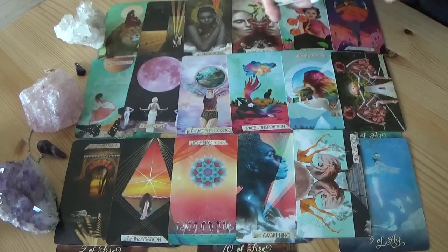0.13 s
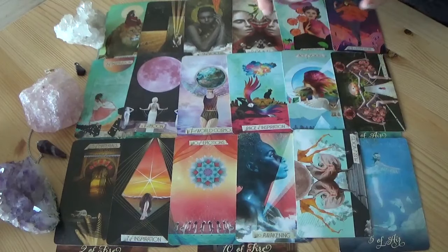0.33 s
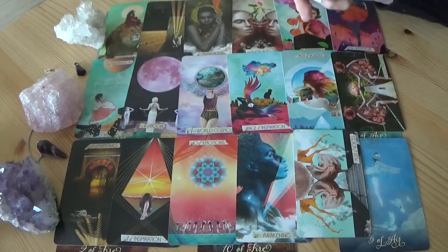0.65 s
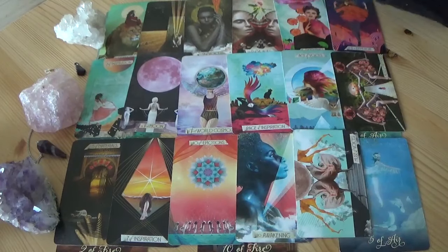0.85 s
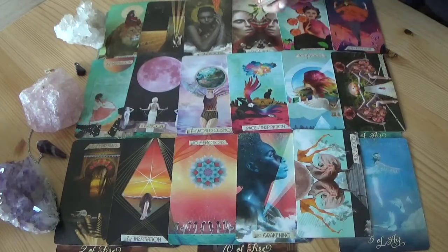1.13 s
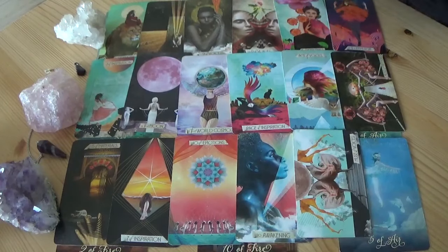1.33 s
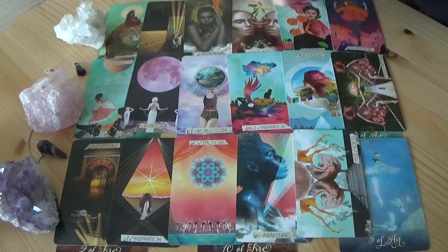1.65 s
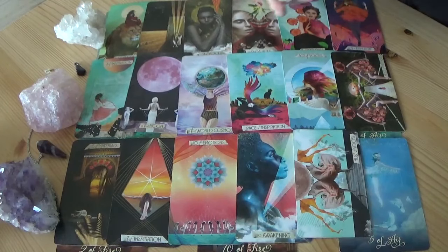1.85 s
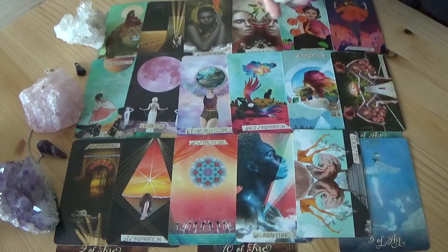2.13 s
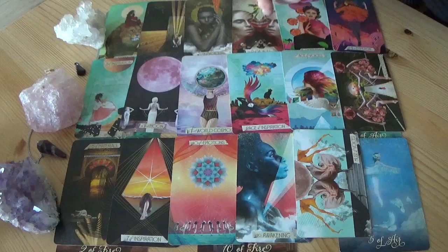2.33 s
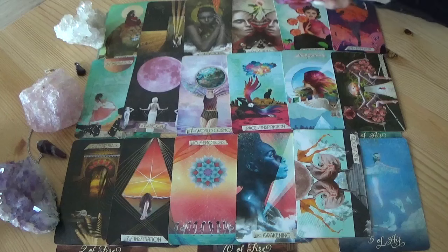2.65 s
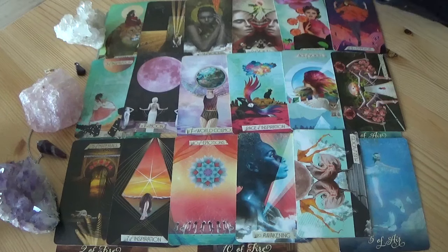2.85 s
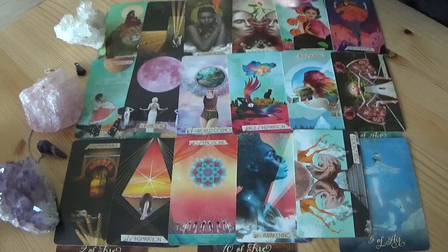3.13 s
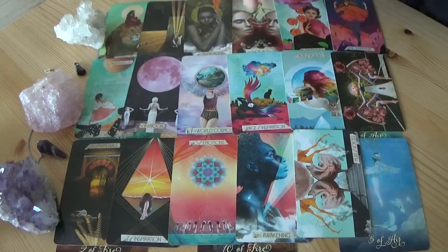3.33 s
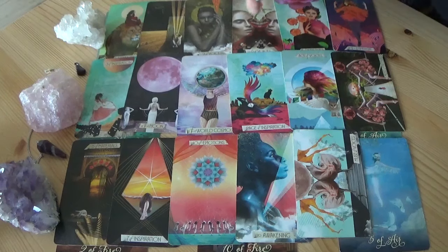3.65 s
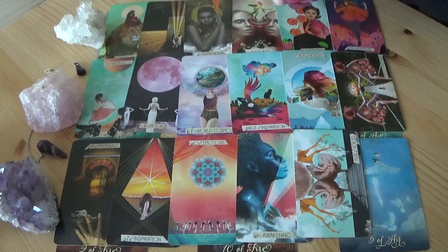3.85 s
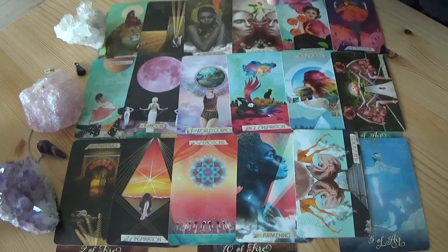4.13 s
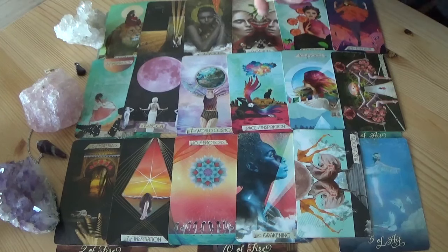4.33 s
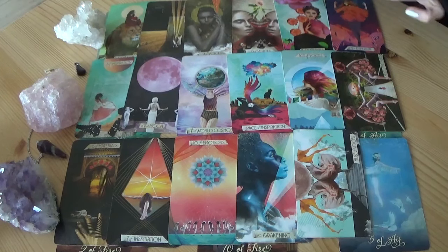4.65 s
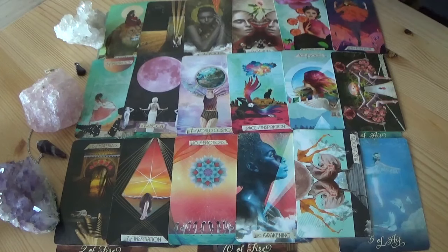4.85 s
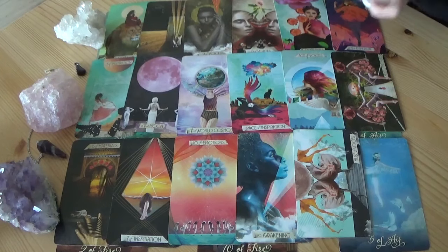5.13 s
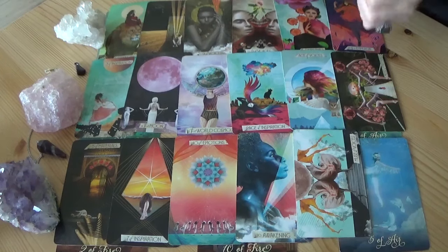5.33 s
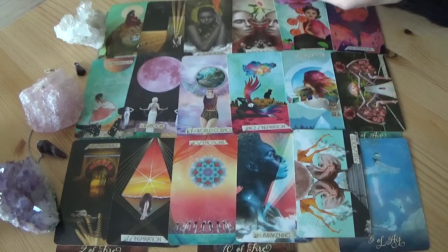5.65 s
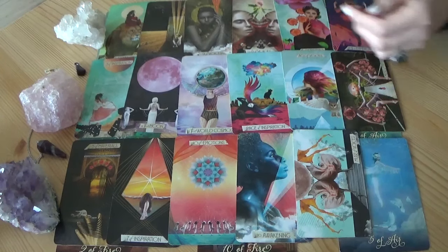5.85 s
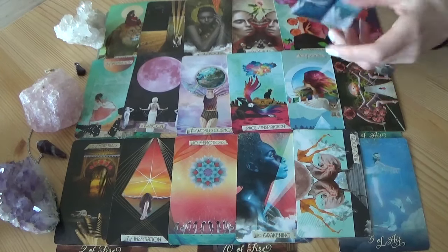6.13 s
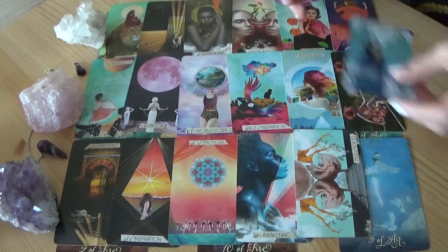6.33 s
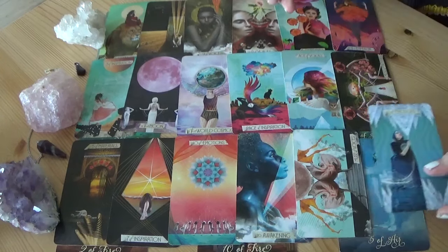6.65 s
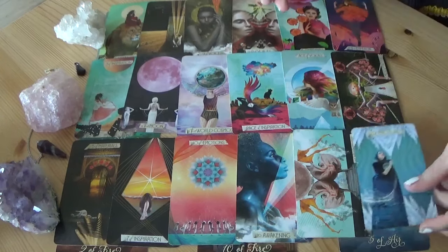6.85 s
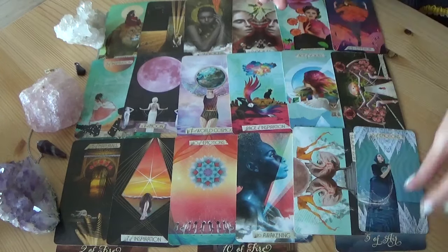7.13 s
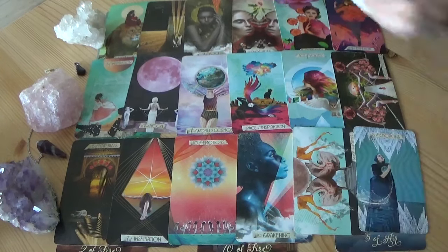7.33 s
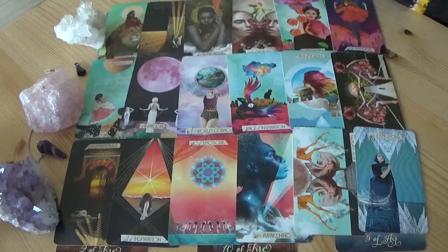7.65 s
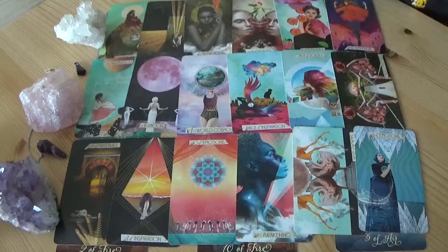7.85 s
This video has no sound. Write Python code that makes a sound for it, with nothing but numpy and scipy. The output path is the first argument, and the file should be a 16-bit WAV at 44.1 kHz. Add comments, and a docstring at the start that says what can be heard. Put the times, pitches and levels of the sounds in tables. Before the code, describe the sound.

Close by, a deck of large stiff cards is shuffled overhand: papery swishes, soft hollow landings and sharp snaps, loudest about one and four seconds in. The pace thins, a card is put down with a light flick, then the deck raps the wooden table in a quick clattering cluster. Small bare room with a short bright tail, faint hum and distant low rumble; small, slightly dull-topped microphone.

```python
"""Overhand card shuffle above a wooden table

Packets of large cards slide (speed-shaped hiss), land (hollow noise thuds) and snap at the edges (crack plus
gliding ring). Late on, one card is laid down with a flick, then the deck is knocked on the table (decaying
modes, clatter and a hollow thump). All return from a small bare room (noise tails). Mains hum (sines), still
air, a faint far-off rush and a low rumble (coloured noise) lie underneath.
"""
import sys
import numpy as np
from scipy import signal
from scipy.fft import rfft, irfft
from scipy.io import wavfile

SR = 44100
rng = np.random.default_rng(int(sys.argv[2]) if len(sys.argv) > 2 else 0)


def put_to_file(sound):
    """Save the sound as 16-bit audio at rate SR, in the file named by the first command-line argument."""
    columns = np.atleast_2d(sound).T  # one column per channel
    safe = np.clip(columns, -1, 1)
    whole_steps = np.round(safe * 32767)
    wavfile.write(sys.argv[1], SR, whole_steps.astype(np.int16))


N = 352800
BLOW_T_S = np.arange(SR // 2) / SR  # time after a blow

# All event levels are relative within their layer.
# Room air spectrum: (frequency [Hz], relative level [dB])
AIR_SPECTRUM = [(15, -36), (25, -4), (48, 1.5), (69, -14), (104, -2.5), (197, -19), (223, -9.5), (296, -16),
                (372, -16.5), (505, -19.5), (635, -22.5), (759, -16), (884, -24), (8530, -31.5),
                (11000, -36), (14300, -63), (22000, -120)]
# Mains hum partials: (frequency [Hz], rms level [dB])
HUM_PARTIALS = [(100, -61.5), (150, -79), (200, -73), (300, -68), (500, -70)]
# Far-off rush and low rumble spectra: (frequency [Hz], relative level [dB])
RUSH_SPECTRUM = [(60, -17.5), (150, 4.5), (400, -6), (900, -1), (1400, -5), (2500, -14.5), (6000, -31.5)]
RUMBLE_SPECTRUM = [(40, -10), (110, -23), (135, -2.5), (162, -4), (195, -15), (300, -24.5), (900, -52.5)]
# Single swell of the rush: (peak time [s], half-width [s], level [dB])
RUSH_SWELL = (1.46, 1.1, -55.5)
# Waves of the rumble: (peak time [s], half-width [s], level [dB])
RUMBLE_SWELLS = [(1.78, 0.055, -48), (2.25, 0.11, -53.5), (3.55, 0.32, -57.5)]
# Difference of the two microphone ports in diffuse sound: (frequency [Hz], relative level [dB])
PORT_DIFFERENCE = [(40, -25), (130, -14), (300, 1), (600, 4), (1100, 4), (2200, 5), (5000, 4.5), (10000, 4)]

# Packets drawn off and dropped back, soft thuds at snaps, and the deck's last thump on the table:
# (landing time [s], draw level [dB], skid length [s], skid level [dB], thud level [dB], hollow pitch [Hz])
LANDINGS = [(.006, -37, 0.0079, -36.5, -37, 408), (1.081, -40.5, 0.017, -32.5, -35, 890),
            (1.365, -58, 0.0069, -32, -43, 326), (1.434, -41.5, 0.047, -29, -35.5, 386),
            (1.732, -47, 0.02, -33.5, -40, 355), (2.022, -50.5, 0.0089, -41, -41.5, 367),
            (2.321, -53.5, 0.023, -35, -45.5, 422), (3.05, -40, .005, -54, -44, 620),
            (3.369, -36.5, 0.02, -25, -31, 410), (3.652, -53, 0.014, -37.5, -38.5, 350),
            (3.699, -41.5, 0.036, -37.5, -42, 664), (3.959, -47, 0.011, -24, -32, 400),
            (4.244, -54.5, 0.026, -32, -39, 422), (5.282, -60.5, 0.01, -46.5, -50, 800),
            (5.38, -42, 0.029, -29.5, -34.5, 285), (5.683, -72, 0.0026, -56.5, -39, 376),
            (5.784, -58, 0.037, -43, -59, 400), (7.05, -69, 0.0032, -44, -39, 418),
            (7.098, -74, 0.0071, -35.5, -36, 378), (7.869, -46, 0.05, -53, -19.5, 311)]
# Cards rubbed over each other: (time of peak speed [s], rise [s], level [dB], lower hiss edge [Hz])
CARD_RUBS = [(0.294, 0.015, -38.5, 4200), (0.557, 0.054, -49.5, 3040), (.668, 0.058, -39, 3460),
             (0.877, .022, -42.5, 1990), (.96, 0.095, -50, 5260), (2.78, 0.34, -56, 3700),
             (3.2, 0.063, -50, 4970), (3.491, .03, -49.5, 4000), (3.62, 0.025, -38, 2500),
             (3.81, .05, -51, 3930), (3.888, 0.008, -42.5, 3980), (3.98, 0.032, -37, 2500),
             (4.508, 0.0086, -40.5, 3570), (4.891, 0.17, -44.5, 1980), (4.924, .07, -37.5, 4440),
             (6.262, 0.036, -52, 1480), (6.379, 0.097, -60, 2000), (6.819, 0.51, -58.5, 2200),
             (7.539, 0.077, -54, 2520), (7.623, 0.023, -36, 4340), (7.944, 0.059, -46.5, 4930)]
# Sliding paper spectrum: (frequency [Hz], relative level [dB])
HISS_SPECTRUM = [(200, 17.5), (1000, 9.5), (2300, 5.5), (4200, 3.5), (5800, 2), (7600, 6), (9500, 5),
                 (11000, -4.5)]
# Draw: thin, bright, fastest just before landing; rise and fall times are to -20 dB
DRAW_LEAD_S, DRAW_RISE_S, DRAW_FALL_S, DRAW_EDGE_HZ = 0.024, 0.1, 0.069, 5430
# Skid: fuller, peaks a share of its length before landing
SKID_LEAD_SHARE, SKID_FALL_S, SKID_EDGE_HZ = 0.2, 0.013, 3680
# Rub: a longer one takes longer to stop
RUB_STOP_S, RUB_FALL_SHARE = 0.019, 0.57
# Second, weaker resonance of the air under what lands
OVERTONE_RATIO, OVERTONE_DB = 2.47, -7.5

# Edges snapping free: (time [s], level [dB], card ring [Hz], treble tilt [units of 0.52 dB/octave])
EDGE_SNAPS = [(.2506, -31, 1710, 1), (0.2914, -34, 7100, -1), (1.082, -12.5, 4000, 7),
              (1.09, -10.5, 3860, 4), (1.099, -20.5, 2620, -5), (1.363, -18, 4820, 2),
              (1.4202, -23.5, 1890, -8), (1.4282, -17, 7500, -3), (1.4388, -22.5, 4170, 5),
              (1.7073, -29.5, 1650, -2.5), (1.7214, -35.5, 7470, 0), (2.0174, -26.5, 1840, -4.5),
              (2.273, -29.5, 9800, 17), (2.2879, -28.5, 8650, 1), (3.0572, -23, 3620, -7.5),
              (3.3094, -25.5, 6000, -2.5), (3.3417, -23.5, 1500, -16), (3.3683, -19.5, 4630, 10),
              (3.6156, -35, 1860, -7), (3.6387, -31.5, 1760, -4), (3.6602, -28, 3000, -12),
              (3.944, -20, 9500, 1), (3.957, -11, 4260, 0.5), (3.967, -22, 1690, -17),
              (4.223, -25, 7090, 8), (4.5053, -27.5, 7700, 4), (5.2785, -36.5, 1140, 7),
              (5.3792, -25, 1170, 8), (5.6843, -31.5, 2490, -3), (6.254, -38, 1870, 6),
              (6.2934, -36, 1630, -6), (7.0473, -26, 3160, -6), (7.0991, -33, 1410, 10),
              (7.8266, -20.5, 1750, -18), (7.8318, -24, 1820, -8), (7.842, -27, 7500, -6),
              (7.8494, -19, 1210, -15), (7.8673, -11.5, 2650, -25.5)]
# Edge crack spectrum: (frequency [Hz], relative level [dB])
CRACK_SPECTRUM = [(200, -11.5), (600, -8), (950, -4.5), (1500, -3), (2000, -2), (2550, 1), (3200, -3),
                  (3900, -1), (4700, 1), (5400, -1.5), (6200, -2), (7800, 0), (11000, -6.5)]
# Ticks of loose edges: level over the skid, scatter, card ring, scatter, tilt as in EDGE_SNAPS
TICK_DB, TICK_SPREAD_DB = -1.5, 0.5
TICK_RING_HZ, TICK_SPREAD_OCTAVES, TICK_TREBLE_TILT = 3020, 0.703, -4.5

# Room tail spectrum: (frequency [Hz], relative level [dB])
WALL_SPECTRUM = [(80, -5), (200, 5), (500, 0.5), (1500, 5), (3000, 0.5), (6000, -2.5), (11000, -1.5)]
# Blows on the table top: (time [s], level [dB], highest pitch the contact drives [Hz])
TABLE_KNOCKS = [(7.0982, -43, 300), (7.8271, -25, 2000), (7.8333, -25, 1610), (7.844, -25, 1780),
                (7.8672, -21, 1320), (7.875, -24.5, 452)]
# Table top modes: (frequency [Hz], relative level [dB], t60 [s])
TABLE_MODES = [(86, -17, 0.059), (127.7, 3.5, 0.39), (221, 1, 0.16), (384, 1, 0.1), (488.5, 2, 0.24),
               (542, -4, 0.26), (638, -8, 0.17), (664, -9, 0.14), (865, -12, .18), (990, -12, .2),
               (1056, 0, .18), (1223, 0.5, 0.18), (1410, -7, 0.25), (1626, -11.5, 0.13), (1772, -1, 0.14),
               (1940, -7, 0.17), (2310, -20, 0.15), (2570, -14, .15)]
# Wooden clatter spectrum: (frequency [Hz], relative level [dB])
WOOD_SPECTRUM = [(60, -15), (130, 7), (280, -2), (700, 0), (1500, -9.5), (2200, -19), (3200, -7),
                 (6000, -27)]


def undb(db):
    """Decibels to gain."""
    return 10 ** (np.asarray(db) / 20)


def unit(x):
    """Scale to rms 1."""
    return x / np.sqrt(np.mean(x ** 2))


def burst(x, seconds):
    """Scale to the energy of rms 1 held for the given time."""
    return x * np.sqrt(seconds * SR / np.sum(x ** 2))


def add(track, start_s, x):
    """Mix x into the track from start_s on."""
    i = int(start_s * SR)
    x, i = x[max(-i, 0):], max(i, 0)
    track[i:i + len(x)] += x[:max(N - i, 0)]


def colour(x, points, tilt_db_per_octave=0., size=4096):
    """Minimum-phase filter through (Hz, dB) points, tilted above 1800 Hz."""
    hz, db = np.transpose(points)
    f = np.maximum(np.arange(size // 2 + 1) * SR / size, 1)
    shape_db = np.interp(np.log(f), np.log(hz), db)
    shape_db = shape_db + tilt_db_per_octave * np.log2(np.maximum(f / 1800, 1))
    # fold the cepstrum to make the response causal
    cepstrum = irfft(np.log(undb(shape_db)))
    cepstrum[1:size // 2] *= 2
    cepstrum[size // 2 + 1:] = 0
    response = irfft(np.exp(rfft(cepstrum, size)))
    return signal.fftconvolve(x, response)[:len(x)]


def cut(x, hz, kind, order=2):
    """Butterworth low-pass or high-pass."""
    sos = signal.butter(order, min(hz, SR / 3), kind, fs=SR, output="sos")
    return signal.sosfilt(sos, x)


def resonate(x, hz, q):
    """One broad resonance."""
    b, a = signal.iirpeak(min(hz, SR / 4), max(q, .6), fs=SR)
    return signal.lfilter(b, a, x)


def noise(count):
    """White noise."""
    return rng.standard_normal(count)


def fade(t, t60_s):
    """Exponential decay by 60 dB in t60_s."""
    return np.exp(-np.log(1000) * t / t60_s)


def walk(count, rate_hz):
    """Random wander: normal draws at rate_hz, joined by straight lines."""
    at = np.arange(count) / SR * rate_hz
    knots = int(at[-1]) + 2
    return np.interp(at, np.arange(knots), noise(knots))


def swell(t, peak_s, half_width_s, db):
    """Gain of something that draws near and recedes."""
    return undb(db) / np.hypot(1, (t - peak_s) / half_width_s)


def background(air_db=-56.5, side_db=-9):
    """Still room air, mains hum, and a far rush with a low rumble that comes and goes."""
    t = np.arange(N) / SR
    rush_gain = swell(t, *RUSH_SWELL)
    rumble_gain = np.sqrt(sum(swell(t, *row) ** 2 for row in RUMBLE_SWELLS))

    def diffuse():
        """One independent draw of air, rush and rumble noise."""
        air = undb(air_db) * unit(colour(noise(N), AIR_SPECTRUM))
        flutter = undb(0.23 * walk(N, 4.68))
        rush = rush_gain * flutter * unit(colour(noise(N), RUSH_SPECTRUM))
        rumble = rumble_gain * unit(colour(noise(N), RUMBLE_SPECTRUM))
        return air + rush + rumble

    mid, side = diffuse(), diffuse()
    hum = sum(undb(db) * np.sqrt(2) * np.sin(2 * np.pi * (hz * t + rng.random()))
              for hz, db in HUM_PARTIALS)
    side = undb(side_db) * colour(side, PORT_DIFFERENCE)
    return mid + hum + np.array([side, -side])


def strokes():
    """All slides as (peak s, rise s, fall s, dB, edge Hz): rubs, plus a draw and a skid per landing."""
    rows = [(s, rise_s, RUB_STOP_S + RUB_FALL_SHARE * rise_s, db, edge_hz)
            for s, rise_s, db, edge_hz in CARD_RUBS]
    for s, draw_db, length_s, skid_db, _, _ in LANDINGS:
        rows.append((s - DRAW_LEAD_S, DRAW_RISE_S, DRAW_FALL_S, draw_db, DRAW_EDGE_HZ))
        rows.append((s - SKID_LEAD_SHARE * length_s, length_s, SKID_FALL_S, skid_db, SKID_EDGE_HZ))
    return rows


def slides(catch_db=2.5, body_db=-17, edge_db=-4, edge_q=0.65, slide_db=-2, roundness=1.25):
    """Paper fibres catch and slip: hiss follows stroke speed, boosted just above its lower edge."""
    out = np.zeros(N)
    for s, rise_s, fall_s, db, edge_hz in strokes():
        t = np.arange(-2 * rise_s, 2 * fall_s, 1 / SR)
        speed = 10 ** -(np.abs(t / np.where(t < 0, rise_s, fall_s)) ** roundness)
        catching = undb(catch_db * walk(len(t), 300))
        grains = colour(noise(len(t)) * catching, HISS_SPECTRUM)
        bright = cut(grains, edge_hz, "high")
        edge = undb(edge_db) * resonate(bright, 1.17 * edge_hz, edge_q)
        body = undb(body_db) * cut(grains, 340, "high")
        add(out, s - 2 * rise_s, undb(db + slide_db) * speed * unit(bright + edge + body))
    return out


def thuds(settle_t60_s=0.058, q=3.3):
    """Cards or the whole deck land and squeeze out the air beneath: a short hollow thud."""
    out, t = np.zeros(N), BLOW_T_S[:SR // 8]
    for s, _, _, _, db, hollow_hz in LANDINGS:
        for ratio, part_db in ((1, 0), (OVERTONE_RATIO, OVERTONE_DB)):
            hz = ratio * hollow_hz
            hollow = resonate(noise(len(t)) * fade(t, settle_t60_s), hz, q)
            hollow = cut(hollow, 0.49 * hz, "high")
            add(out, s, undb(db + part_db) * burst(hollow, 0.0041))
    return out


def ticks(count=3):
    """Loose edges catch at random during a skid: snap rows that follow its level."""
    rows = []
    for s, _, length_s, skid_db, _, _ in LANDINGS:
        for early, size, pitch in zip(rng.random(count), noise(count), noise(count)):
            db = skid_db + TICK_DB + TICK_SPREAD_DB * size
            ring_hz = TICK_RING_HZ * 2 ** (TICK_SPREAD_OCTAVES * pitch)
            rows.append((s - early * length_s, db, ring_hz, TICK_TREBLE_TILT))
    return rows


def snaps(ring_db=-5, ring_spread_db=-12, snap_db=1, spread_db=-3, tilt_db_per_octave=0.52, glide=0.036):
    """An edge lets go: crack and flexed-card ring; also returns the plainer click fed to the room."""
    direct, spread = np.zeros((2, N))
    t = BLOW_T_S[:SR // 20]
    decay = fade(t, .0095)
    shape = decay * (1 - np.exp(-t / .0007))
    for s, db, ring_hz, treble in EDGE_SNAPS + ticks():
        tilt = tilt_db_per_octave * treble
        crack = burst(colour(noise(len(t)) * shape, CRACK_SPECTRUM, tilt), 0.00043)
        # the ring sinks as the card relaxes
        hz = ring_hz * (1 + glide * (2 * decay - 1))
        ring = burst(np.sin(2 * np.pi * np.cumsum(hz) / SR) * shape, 0.00056)
        click = burst(colour(signal.unit_impulse(len(t)), CRACK_SPECTRUM, tilt), 0.00063)
        add(direct, s, undb(db + snap_db) * (crack + undb(ring_db) * ring))
        add(spread, s, undb(db + spread_db) * (click + undb(ring_spread_db) * ring))
    return direct, spread


def room(x, wet_db, echo_db, low_t60_s=0.62, high_t60_s=0.37, echo_t60_s=0.017):
    """After a short gap: a smeared echo from a near surface and the tail of a small bare room."""
    gap = np.zeros(int(.0092 * SR))
    tails = []
    for _ in range(2):
        n = noise(len(BLOW_T_S))
        low = cut(n, 5300, "low", order=1) * fade(BLOW_T_S, low_t60_s)
        high = cut(n, 2900, "high", order=1) * fade(BLOW_T_S, high_t60_s)
        tail = burst(colour(low + high, WALL_SPECTRUM), 1 / SR)
        tail = np.concatenate([gap, tail])
        tails.append(undb(wet_db) * signal.fftconvolve(x, tail)[:N])
    near = burst(noise(len(BLOW_T_S)) * fade(BLOW_T_S, echo_t60_s), 1 / SR)
    near = np.concatenate([gap, near])
    mid = tails[0] + undb(echo_db) * signal.fftconvolve(x, near)[:N]
    side = .33 * colour(tails[1], PORT_DIFFERENCE)
    return np.array([mid + side, mid - side])


def knocks(clatter_t60_s=0.089, clatter_db=-2, stiff_hz=220):
    """The table top rings in its modes, over a dense short clatter of the board and what lies on it."""
    out = np.zeros(N)
    modes = np.zeros(len(BLOW_T_S))
    for k, (hz, db, t60_s) in enumerate(TABLE_MODES):
        # neighbouring modes swing in opposite directions
        modes += (-1) ** k * undb(db) * np.sin(2 * np.pi * hz * BLOW_T_S) * fade(BLOW_T_S, t60_s)
    for s, db, contact_hz in TABLE_KNOCKS:
        clatter = colour(noise(len(BLOW_T_S)) * fade(BLOW_T_S, clatter_t60_s), WOOD_SPECTRUM)
        clatter = cut(clatter, stiff_hz, "high", order=1)
        blow = cut(unit(modes) + undb(clatter_db) * unit(clatter), contact_hz, "low")
        # a light, hard contact hardly moves the whole board
        blow = cut(blow, 0.18 * contact_hz, "high")
        add(out, s, undb(db) * burst(blow, .016))
    return out


def scene(hands_pan_db=-0.56, table_pan_db=-0.9):
    """Mix all layers, a little right of centre; cards and table return from the room."""
    lean = np.array([[.5], [-.5]])  # left, right share of the pan
    edges, clicks = snaps()
    landings, hiss, blows = thuds(), slides(), knocks()
    hands = edges + room(clicks, wet_db=-5.5, echo_db=-8)
    hands = hands + landings + room(landings, wet_db=-7, echo_db=-7.5)
    hands = hands + hiss + room(hiss, wet_db=-9.5, echo_db=-45)
    table = blows + room(blows, wet_db=-8, echo_db=-9)
    return (hands + background()) * undb(hands_pan_db * lean) + table * undb(table_pan_db * lean)


def record(dry, low_hz=28.3, top_hz=11030):
    """A small microphone: steep high-pass in the deepest bass, steep elliptic low-pass in the treble."""
    thin = cut(dry, low_hz, "high", order=8)
    top = signal.ellip(10, .2, 75, top_hz, fs=SR, output="sos")
    return signal.sosfilt(top, thin)


dry = scene()
out = record(dry)
put_to_file(out)
```